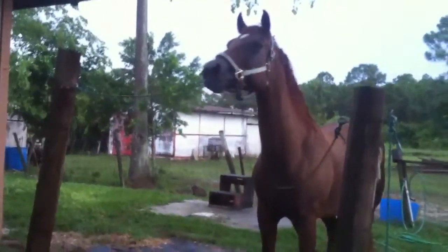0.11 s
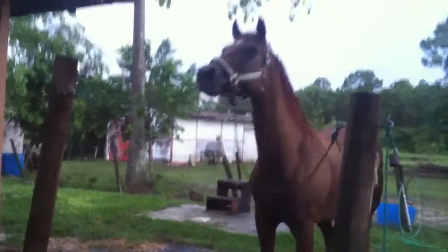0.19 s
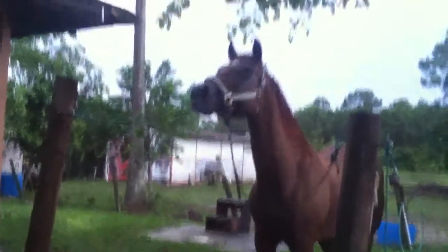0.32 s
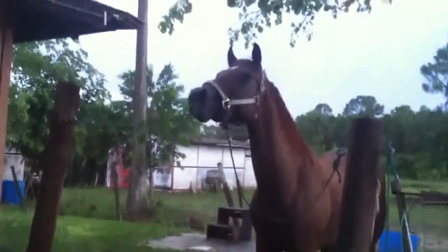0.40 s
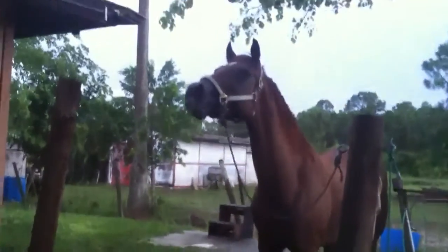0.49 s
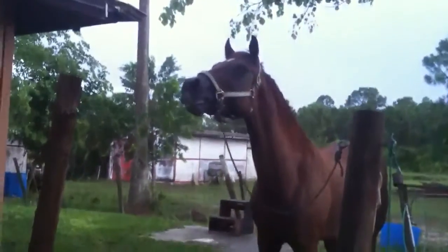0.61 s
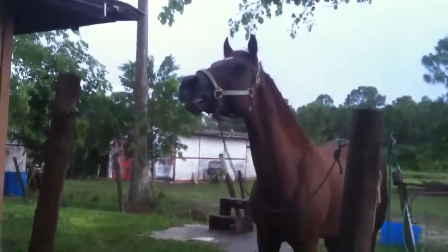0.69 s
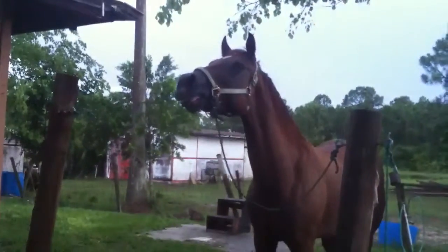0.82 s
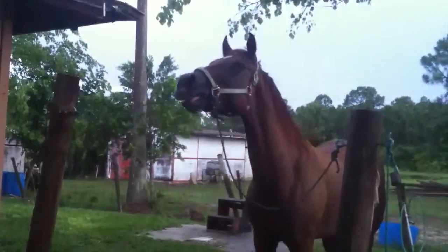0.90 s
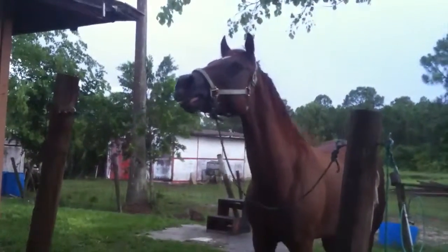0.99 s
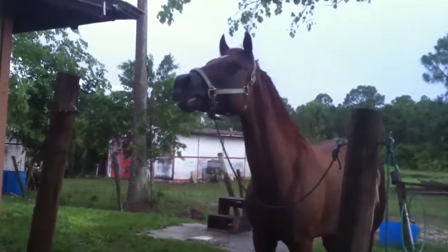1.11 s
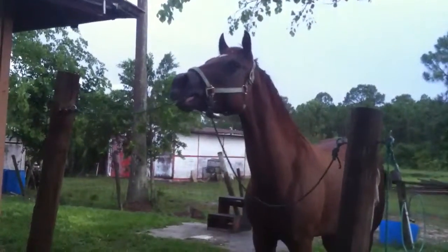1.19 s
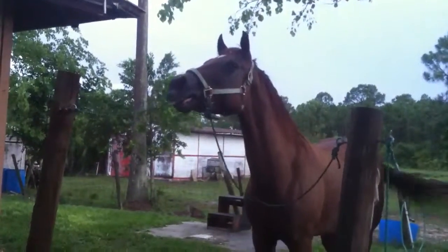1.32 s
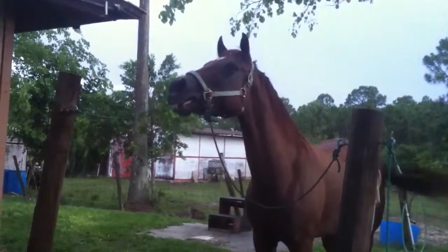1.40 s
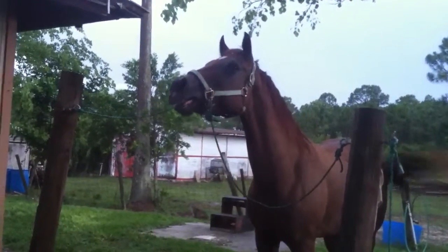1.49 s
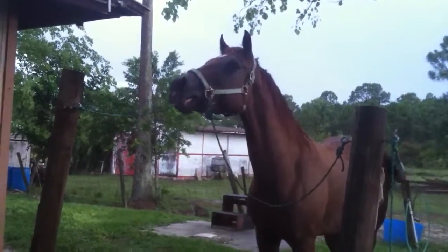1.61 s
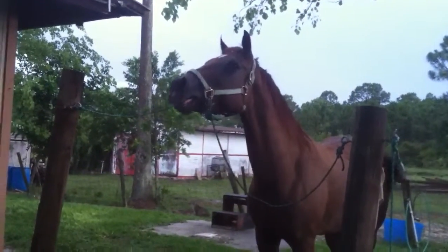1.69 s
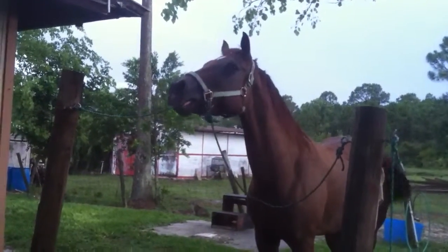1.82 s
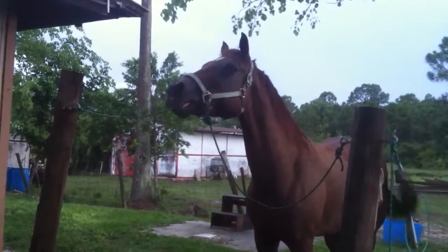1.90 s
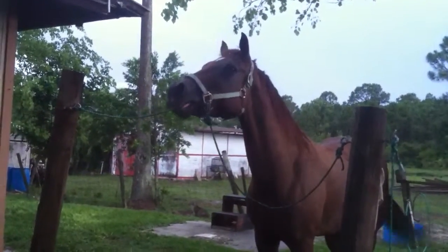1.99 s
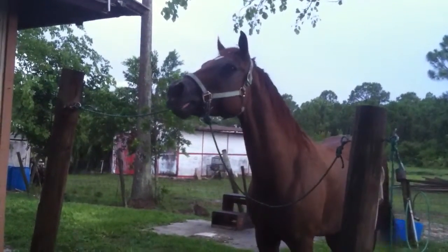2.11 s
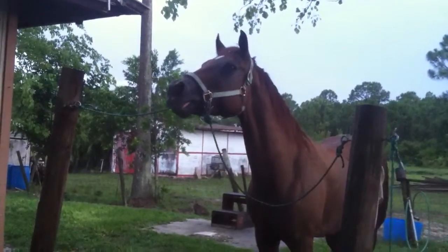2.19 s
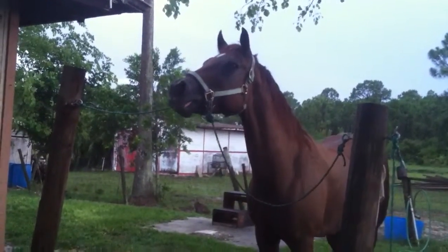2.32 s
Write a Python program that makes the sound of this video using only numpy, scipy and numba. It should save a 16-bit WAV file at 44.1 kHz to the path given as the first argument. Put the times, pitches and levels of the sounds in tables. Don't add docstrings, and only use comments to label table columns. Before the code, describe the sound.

After a knock on the camera, a single horse whinny climbs, breaks and shudders about seven times a second, then sinks to a rough growl; short echoes return outdoors over quiet yard hiss and insects.

```python
import sys
import numpy as np
from scipy import signal
from scipy.io import wavfile
from scipy.ndimage import uniform_filter1d
from numba import njit

SR = 44100
rng = np.random.default_rng(int(sys.argv[2]) if len(sys.argv) > 2 else 0)


def wav_out(sig):
    wavfile.write(sys.argv[1], SR, np.round(np.clip(np.atleast_2d(sig).T, -1, 1) * 32767).astype(np.int16))


def field_ratio(decibels):
    return 10 ** (np.asarray(decibels, dtype=float) / 20)


N = 105840

# start_s, level_db, pitch_hz, t60_s
KNOCKS = [
    (0.0, -34, 222, 0.083),
    (.3, -57, 130, .04),
    (.47, -41, 70, .05),
    (.505, -53, 60, .03),
    (0.672, -48, 60, 0.027),
    (.79, -57, 60, .03),
    (1.08, -54, 60.3, .04),
    (1.87, -43, 54.92, .04),
]
# centre_hz, density_db
YARD_SPECTRUM = [(24, -27), (60, -20), (160, -2.5), (415, -8), (771, -14.5), (1340, -11.5), (2200, -5.5),
                 (4000, -13), (12000, -45), (15600, -75), (22000, -120)]
# centre_hz, width_hz, level_db, start_s (below 0 = already sounding), drift_hz_per_s
INSECTS = [(3710, 94, -51.5, -2, 19), (1646, 130, -56, 0, -8), (6300, 240, -64, 3.5, 1509),
           (3900, 690, -54.5, -1.5, 3), (1940, 230, -46, -1.5, 9008), (4410, 44, -39.5, 1, 2),
           (3750, 290, -56, 2.25, 2200)]
INSECT_LENGTHS_S = [3, 6, 1, 1.5, 0.065, 0.077, 1]
# time_s, pitch_hz, level_db
SQUEAL = [
    (.055, 1058, -50),
    (.095, 1394, -42),
    (.125, 1517, -31),
    (.165, 1550, -28.5),
    (.2, 1720, -29.5),
    (.235, 1792, -18),
    (.278, 1590, -23.5),
    (.31, 1780, -20),
    (.345, 1841, -16),
]
SQUEAL_PARTIALS_DB = [-5.5, -10, -15, -23.5, -33, -45, -70]
# time_s, pitch_hz, level_db
WHISTLE = [
    (.335, 2068, -23),
    (.355, 2084, -12.5),
    (.44, 2078, -14.5),
    (.6, 2032, -15.5),
    (1.0, 2001, -19.5),
    (1.5, 1999, -17),
    (1.78, 1990, -22.5),
    (1.95, 2014, -27.5),
    (2.07, 2000, -28),
    (2.15, 1983, -48),
]
WHISTLE_PARTIALS_DB = [0, -22.5, -33, -54]
# time_s, depth_db, length_s
CATCHES = [(0.44, -3.5, 0.0076), (0.709, -9, 0.01), (0.856, -8.5, 0.024), (1.036, -1.5, 0.014),
           (1.149, -0.5, 0.012), (1.271, -6.5, .02), (1.413, -9, 0.02), (1.537, -13, 0.012),
           (1.679, -6, 0.026), (1.832, -12, 0.018), (1.976, -22, 0.029)]
# start_s, rasp_db
HEAVES = [(.335, -24), (0.453, -22), (.59, -21.5), (0.719, -22.5), (0.861, -22.5), (1.009, -21),
          (1.152, -21), (1.29, -20.5), (1.427, -19.5), (1.56, -19.5), (1.701, -20), (1.834, -24.5),
          (1.978, -24), (2.09, -29.5)]
# crest_s, level_db, rise_s, fall_s
SWELLS = [(.38, -47, 0.038, .03), (.45, -44, 0.033, .03), (.54, -32, 0.046, 0.027), (.67, -27, 0.05, 0.028),
          (.81, -27, 0.052, 0.024), (.95, -28.5, .055, 0.032), (1.09, -25, 0.045, 0.025),
          (1.24, -23.5, 0.045, 0.024), (1.384, -23, .04, 0.021), (1.51, -24.5, 0.04, 0.028),
          (1.563, -26.5, 0.022, 0.0068), (1.655, -21.5, .025, 0.019), (1.711, -26, 0.019, 0.0096),
          (1.792, -22, 0.024, 0.023), (1.84, -26.5, 0.021, 0.021), (1.878, -24.5, .015, .02),
          (1.922, -27, .015, 0.013)]
# lowest_s, lowest_pitch_hz, fall_s, recovery_s
SWOOPS = [(0.346, 199, 0.019, 0.041), (.46, 207.8, 0.036, 0.042), (0.598, 210.1, .03, 0.029),
          (0.736, 204.4, .025, .04), (.875, 215, 0.024, .045), (1.02, 213.4, .025, .03),
          (1.155, 226.7, .02, .02), (1.265, 200, 0.029, .025), (1.402, 188.4, .03, 0.021),
          (1.537, 150.1, 0.024, .022), (1.685, 147.5, 0.027, .022), (1.812, 158, .02, 0.019),
          (1.862, 189.5, .012, 0.022), (1.935, 174.7, .025, .02)]
LOW_PARTIALS_DB = [5, -5.5, -11.5, -10]
# centre_hz, width_hz, level_db
THROAT = [(231, 76, -15.5), (500, 77, -5.5), (705, 82, -10.5), (1062, 275, -2), (1582, 212, -1),
          (1780, 94, 7), (2200, 173, -5), (2475, 118, -0.5), (2713, 340, 0), (3130, 810, -7.5),
          (4180, 830, -4), (4660, 1270, -11), (6090, 810, -10), (7064, 354, -13)]
# centre_hz, width_hz, level_db
AIR = [(8030, 1300, -28.5), (10140, 1120, -36.5), (11500, 670, -43.5), (12800, 500, -63)]
# time_s, length_s, centre_hz, level_db
MOUTH = [(0.312, 0.054, 2046, -33), (0.545, 0.056, 2280, -27), (.79, .06, 2220, -23.5),
         (0.933, .05, 2207, -22.5), (1.073, 0.036, 2175, -17.5), (1.352, 0.019, 1128, -30),
         (1.43, .03, 1765, -25.5), (1.594, 0.046, 1594, -26.5), (1.754, 0.045, 1820, -20.5),
         (1.776, 0.05, 1584, -30.5), (1.917, 0.019, 1090, -25), (2.04, 0.036, 1100, -24.5),
         (2.102, 0.023, 2750, -45.5)]
# time_s, flap_rate_hz, level_db
GROWL = [
    (1.75, 87.8, -60),
    (1.82, 85.02, -39),
    (1.9, 80.9, -28),
    (1.97, 80.05, -26),
    (2.03, 74.94, -30),
    (2.11, 69.95, -27),
    (2.15, 68.2, -40.5),
    (2.19, 66, -51),
]
# centre_hz, width_hz, level_db
CHEST = [(215, 80.3, -1), (423, 88, -4.5), (1000, 220, -12)]

WHINNY_START_S, WHINNY_END_S = HEAVES[0][0], 2.155


def level(x):
    return x / np.sqrt(np.mean(x ** 2))


def column(table, k, t):
    rows = np.array(table, float)
    return np.interp(t, rows[:, 0], rows[:, k])


def bump(t, peak_s, rise_s, fall_s):
    return np.exp(-((t - peak_s) / np.where(t < peak_s, rise_s, fall_s)) ** 2)


@njit
def svf(x, hz, width):
    y, b, l = np.empty(len(x)), 0., 0.
    for i in range(len(x)):
        g, k = np.tan(np.pi * hz[i] / SR), width / hz[i]
        v = (b + g * (x[i] - l)) / (1 + g * (g + k))
        b, l, y[i] = 2 * v - b, l + 2 * g * v, k * v
    return y


def band(x, hz, width):
    hz = hz + np.zeros(N)
    once = svf(x + 1e-18, hz, 1.65 * width)
    return svf(once, hz, 1.65 * width)


def noise():
    return rng.standard_normal(N)


def high_pass(x, order, hz):
    return signal.sosfilt(signal.butter(order, hz, "high", fs=SR, output="sos"), x)


def walk(rate_hz):
    return level(signal.sosfilt(signal.butter(2, rate_hz, fs=SR, output="sos"), noise()))


def running_phase(hz):
    return 2 * np.pi * np.cumsum(hz) / SR


def stack(phase, partials_db, wander_db=0.):
    total = 0
    for k, db in enumerate(partials_db):
        total = total + field_ratio(db + wander_db * walk(26.7)) * np.sin((k + 1) * phase + k * k)
    return total * np.sqrt(2)


def knocks(t):
    rattle_db, rattle_t60_s = -42.5, 0.18
    rattle = level(band(noise(), 550.0, 900.))
    out = field_ratio(rattle_db) * rattle * np.exp(-np.log(1000) * t / rattle_t60_s)
    for start_s, db, hz, t60_s in KNOCKS:
        age = np.maximum(t - start_s, 0)
        out = out + field_ratio(db) * np.sin(2 * np.pi * hz * age) * np.exp(-np.log(1000) * age / t60_s)
    return out


def yard(t):
    yard_db, flicker_db = -51.5, 2.9
    out, rows = 0, np.array(YARD_SPECTRUM)
    for hz in 50 * 2 ** np.arange(0, 8, .5):
        density_db = np.interp(np.log(hz), np.log(rows[:, 0]), rows[:, 1])
        db = density_db + 10 * np.log10(hz) + flicker_db * walk(6.5)
        out = out + field_ratio(db) * level(band(noise(), hz, hz / 3))
    return level(out) * field_ratio(yard_db)


def insects(t):
    out = 0
    for (hz, width, db, start_s, drift), length_s in zip(INSECTS, INSECT_LENGTHS_S):
        on = uniform_filter1d(1. * (t >= start_s) * (t < start_s + length_s), size=900)
        centre = hz + drift * np.clip(t - start_s, 0, length_s)
        out = out + on * field_ratio(db + 2.7 * walk(9.1)) * level(band(noise(), centre, width))
    return out


def squeal(t):
    frays_s, fray_depth, waver_db = 0.274, 0.39, 1.5
    dulls_s, dull_db = 0.316, -6
    fray = fray_depth * np.clip((t - frays_s) / 0.018, .12, 1)
    phase = running_phase(column(SQUEAL, 1, t) * (1 + 0.042 * fray * walk(240)))
    dulling = dull_db * np.clip((t - dulls_s) / 0.034 + .5, 0, 1)
    partials_db = [db + min(k, 3) * dulling for k, db in enumerate(SQUEAL_PARTIALS_DB)]
    on = uniform_filter1d(1. * (t > SQUEAL[0][0]) * (t < SQUEAL[-1][0]), size=400)
    loudness = on * field_ratio(column(SQUEAL, 2, t) + waver_db * walk(28)) * (1 + fray * walk(150))
    hiss = field_ratio(-43) * bump(t, 0.283, 0.019, .07) * level(band(noise(), 6860, 1900))
    return hiss + loudness * stack(phase, partials_db, wander_db=3.5)


def heave(t):
    crest = 0.62
    rows = np.array(HEAVES, float)
    starts = np.append(rows[:, 0], WHINNY_END_S)
    k = np.clip(np.searchsorted(starts, t) - 1, 0, len(rows) - 1)
    place = np.clip((t - starts[k]) / (starts[k + 1] - starts[k]), 0, 1)
    swell = np.sin(np.pi / 2 * np.where(place < crest, place / crest, (1 - place) / (1 - crest)))
    smooth = lambda v: uniform_filter1d(v, size=600)
    on = smooth(1. * (t > starts[0]) * (t < WHINNY_END_S))
    return smooth(swell), smooth(rows[k, 1]), on


def low_phase(t):
    top_hz = 262.2
    hz = top_hz - sum((top_hz - low) * bump(t, s, fall, back) for s, low, fall, back in SWOOPS)
    return running_phase(hz * (1 + .015 * walk(60)))


def whistle(t, swell, low):
    jitter, jitter_hz, chaos_hz, steady = .009, 60, 100, 1.15
    dip_db, sideband = 0.5, 0.41
    high = running_phase(column(WHISTLE, 1, t) * (1 + jitter * walk(jitter_hz)))
    flutter = walk(chaos_hz)
    rough = level(steady + flutter - uniform_filter1d(flutter, size=1500))
    catch_db = sum(db * bump(t, s, length, length) for s, db, length in CATCHES)
    chaos = field_ratio(catch_db) * rough * (1 + sideband * swell * np.cos(low))
    loudness = (t > WHISTLE[0][0]) * field_ratio(column(WHISTLE, 2, t) + dip_db * (0.5 - swell))
    return loudness * chaos * stack(high, WHISTLE_PARTIALS_DB)


def low_voice(t, low):
    dip_db = -47
    swells = field_ratio(dip_db) + sum(field_ratio(db) * bump(t, s, rise, fall) for s, db, rise, fall in SWELLS)
    return swells * field_ratio(1.4 * walk(27) - 7.5) * stack(low, LOW_PARTIALS_DB)


def air_puffs(low):
    cycle = low / (2 * np.pi) % 1
    return np.exp(-cycle) * field_ratio(0.49 * walk(30)) * noise()


def rasp(t, puffs, swell, rasp_db, on):
    bright_fall_db, air_rise_db, top_rise_db = -9, -0.5, 18
    dip_db, attack_s = -7, 0.035
    crack_s, crack_length_s, crack_db = 0.283, 0.013, -37
    tired = (t - WHINNY_START_S) / (WHINNY_END_S - WHINNY_START_S)
    ring = 0
    for k, (hz, width, db) in enumerate(THROAT + AIR):
        if hz < AIR[0][0]:
            change_db = bright_fall_db * np.log2(hz / 1000.) / 2
        else:
            change_db = air_rise_db if hz < AIR[-1][0] else top_rise_db
        moving_hz = hz * (1 + 0.018 * walk(9))
        ring = ring + (-1) ** k * field_ratio(db + tired * change_db) * band(puffs, moving_hz, width)
    crack = field_ratio(crack_db) * np.exp(-((t - crack_s) / crack_length_s) ** 2)
    blowing = on * np.clip((t - WHINNY_START_S) / attack_s, 0, 1)
    return level(ring) * (crack + blowing * field_ratio(rasp_db + dip_db * (1 - swell)))


def mouth_rings(t, puffs):
    width_hz = 65
    out = 0
    for s, length, hz, db in MOUTH:
        out = out + field_ratio(db) * bump(t, s, length, length) * level(band(puffs, hz, width_hz))
    return out


def whinny(t):
    swell, rasp_db, on = heave(t)
    low = low_phase(t)
    puffs = air_puffs(low)
    voices = on * (whistle(t, swell, low) + low_voice(t, low))
    return voices + mouth_rings(t, puffs) + rasp(t, puffs, swell, rasp_db, on)


def growl(t):
    cycles = np.cumsum(column(GROWL, 1, t) * (1 + 0.12 * walk(39.45))) / SR
    flaps = np.diff(np.floor(cycles), prepend=0) * field_ratio(2.4 * walk(59.6))
    ring = sum(field_ratio(db) * band(flaps, hz, width) for hz, width, db in CHEST)
    return level(ring) * field_ratio(column(GROWL, 2, t)) * (t > GROWL[0][0]) * (t < GROWL[-1][0])


def echo_tail(t60_s):
    gap_s = .015
    age = np.arange(SR) / SR
    tail = rng.standard_normal(SR) * np.exp(-np.log(1000) * age / t60_s) * (age > gap_s)
    return level(tail) / np.sqrt(SR)


def echoes(horse):
    barn_db, barn_t60_s = -9, 0.2
    trees_db, trees_t60_s = -22, 1.8
    reflections = field_ratio(barn_db) * echo_tail(barn_t60_s) + field_ratio(trees_db) * echo_tail(trees_t60_s)
    return high_pass(signal.fftconvolve(horse, reflections)[:N], 2, 450)


def scene():
    t = np.arange(N) / SR
    horse = high_pass(squeal(t) + whinny(t), 4, 134) + growl(t)
    return (horse + echoes(horse) + knocks(t) + yard(t) + insects(t))[None]


def low_pass(x):
    return signal.sosfilt(signal.butter(12, 15070, fs=SR, output="sos"), x)


def record(dry):
    rounded = 1.516 * np.tanh(dry / 1.375)
    return low_pass(high_pass(rounded, 2, 127))


dry = scene()
out = record(dry)
wav_out(out)
```